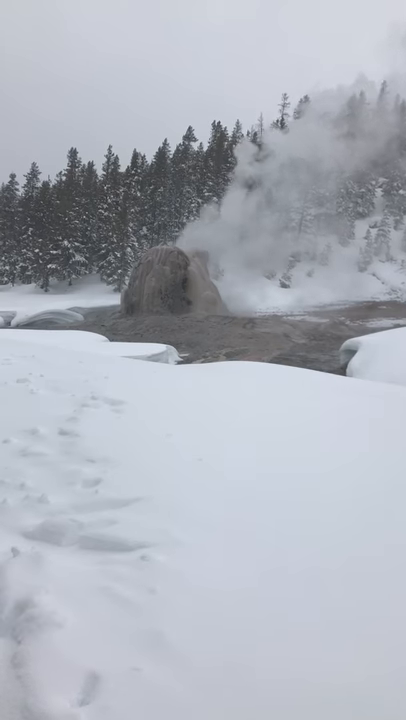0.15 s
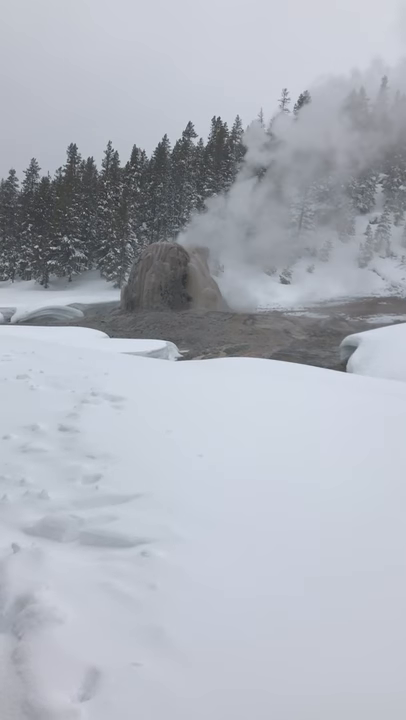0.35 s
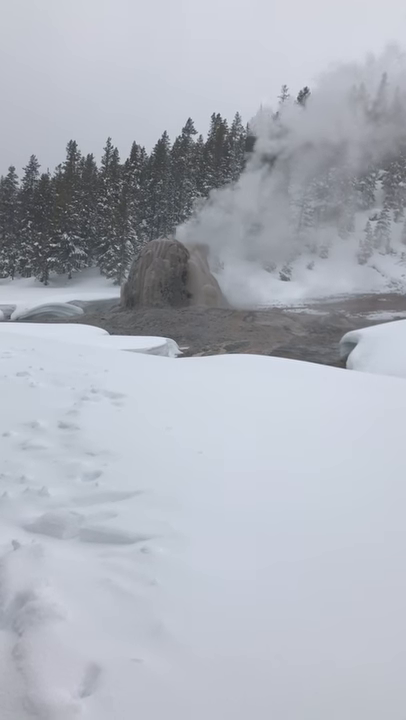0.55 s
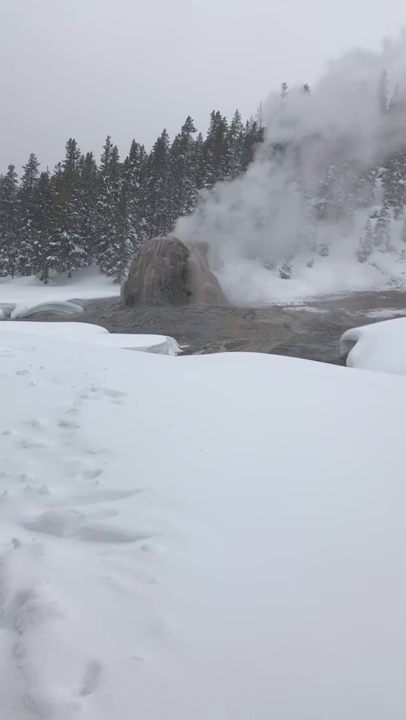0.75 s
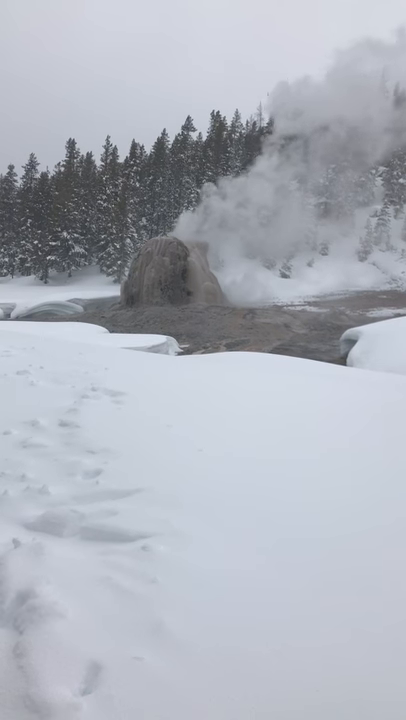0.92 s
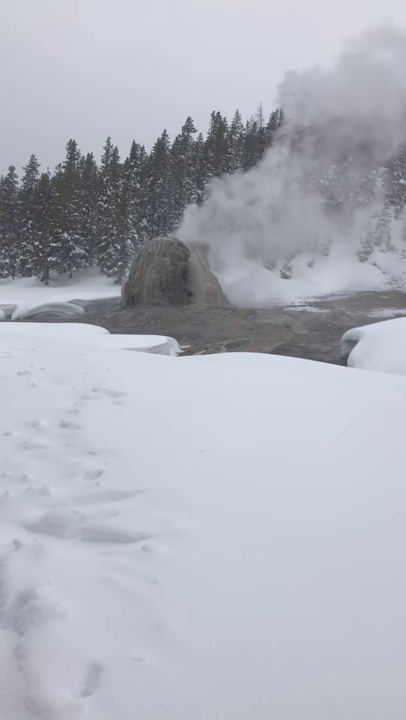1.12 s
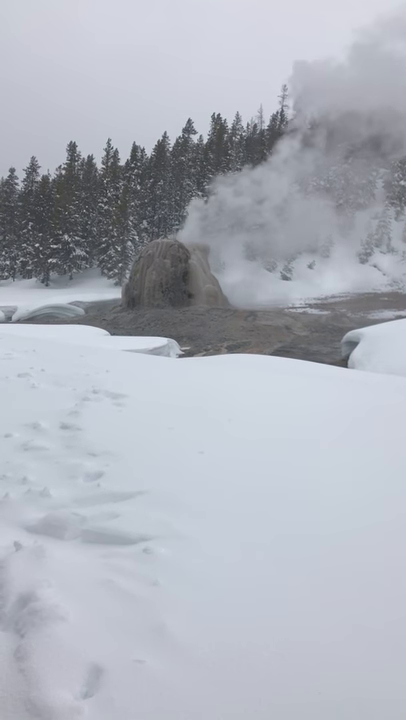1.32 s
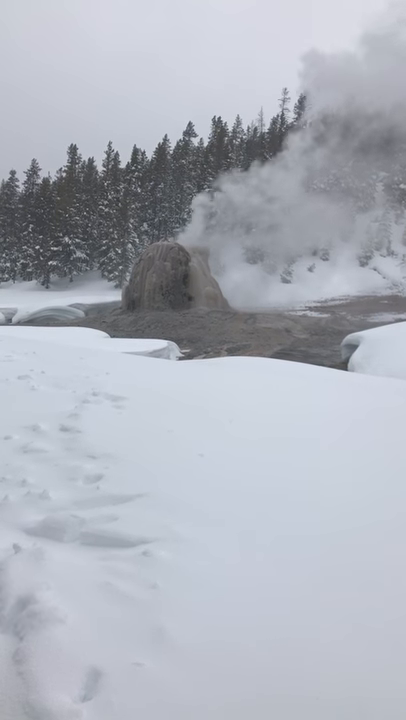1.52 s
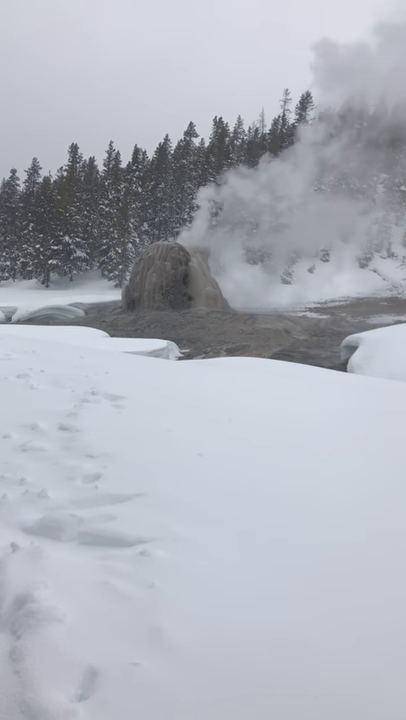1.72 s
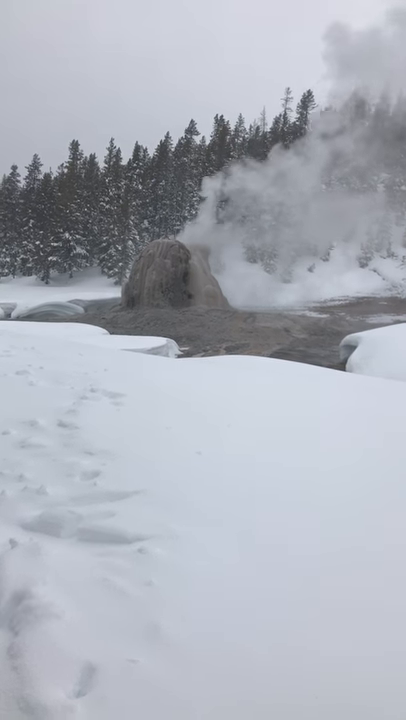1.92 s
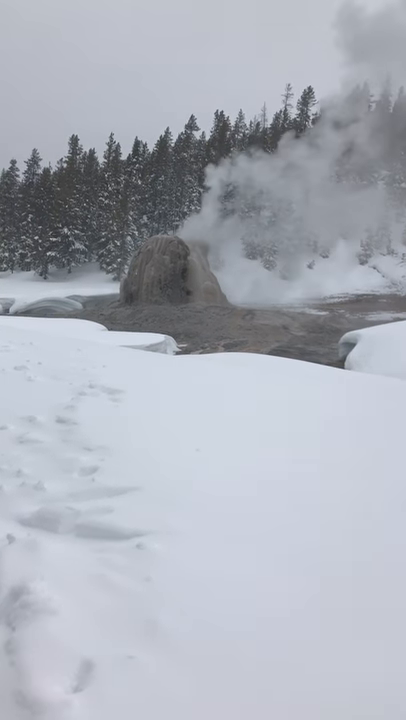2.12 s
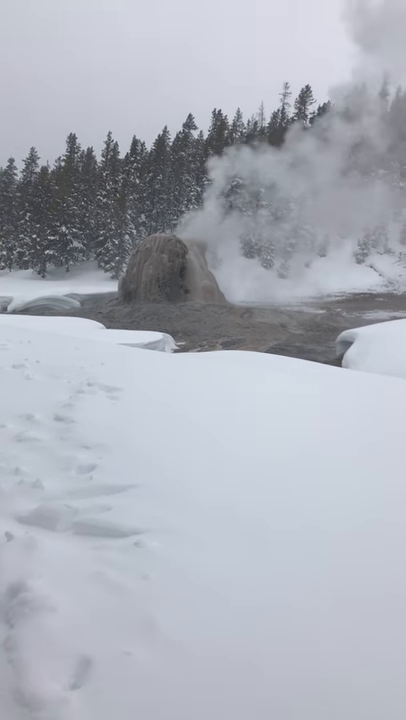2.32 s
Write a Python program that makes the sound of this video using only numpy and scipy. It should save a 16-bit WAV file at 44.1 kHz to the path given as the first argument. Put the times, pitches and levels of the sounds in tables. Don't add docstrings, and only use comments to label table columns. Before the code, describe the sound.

Steady rushing hiss of a steam vent outdoors, fine water spatter, wind bumps and tiny ticks

```python
import sys
import numpy as np
from scipy import signal
from scipy.fft import rfft, irfft
from scipy.io import wavfile
from scipy.ndimage import uniform_filter1d

SR = 44100
rng = np.random.default_rng(int(sys.argv[2]) if len(sys.argv) > 2 else 0)


def elevation(decibels):
    levels = np.asarray(decibels, float)
    return 10 ** (levels / 20)


def transcribe(u):
    v = np.clip(np.atleast_2d(u).T, -1, 1)
    q = np.round(v * 32767).astype(np.int16)
    wavfile.write(sys.argv[1], SR, q)


N = 103635
T = np.arange(N) / SR


def curve(table):
    times, values = np.array(table).T
    return np.interp(T, times, values)


def level(x, db):
    return x * elevation(db) / np.sqrt(np.mean(x ** 2))


def band(x, hz, width):
    b, a = signal.iirpeak(min(hz, .45 * SR), hz / width, fs=SR)
    return signal.lfilter(b, a, x)


def band_noise(hz, width, second_width):
    return band(band(rng.standard_normal(N), hz, width), hz, second_width)


def walk(rate_hz):
    hold = int(SR / rate_hz)
    w = np.repeat(rng.standard_normal(N // hold + 1), hold)
    w = uniform_filter1d(uniform_filter1d(w, hold), hold)[:N]
    w = w - uniform_filter1d(w, size=4 * hold)
    return w / w.std()


def ring(start_s, size, hz, decay_s, rise_s):
    t = np.arange(int(5 * decay_s * SR) + 8) / SR
    i = int(start_s * SR)
    envelope = np.exp(-t / decay_s) * (1 - np.exp(-t / rise_s))
    wave = size * np.sin(2 * np.pi * hz * t) * envelope
    return slice(i, min(i + len(t), N)), wave[:N - i]


def throat():
    # pitch_hz, width_hz, level_db
    modes = [
        (464, 190, -9.5),
        (637, 197, 4.5),
        (957, 185, 0.5),
        (1099, 240, 2),
        (1545, 180, -4),
    ]
    # start_s, level_db
    surge = [(.05, -60), (.32, -61), (.54, -62), (.64, -52), (.7, -60), (.78, -52.5), (.95, -53.5),
             (1.02, -60.5), (1.09, -57), (1.19, -62.5), (1.51, -64), (1.59, -56), (1.78, -55),
             (1.94, -56.5), (2.06, -54.5), (2.19, -53), (2.26, -60), (2.34, -49)]
    shared_gulp_db = .9 * walk(21.9)
    roar = np.zeros(N)
    for hz, width, db in modes:
        gain = elevation(db + shared_gulp_db + 1.3 * walk(15))
        roar += gain * band_noise(hz, width, 1.4 * width) / np.sqrt(width)
    return level(roar, -0.13) * elevation(curve(surge))


def spurts():
    spurts_per_s, decay_s, spurt_db = 70, 0.0013, -1.5
    kicks = np.zeros(N)
    when, size = rng.random((400, 2))[:int(spurts_per_s * N / SR)].T
    kicks[(when * N).astype(int)] = elevation(spurt_db) * np.minimum(-np.log(1 - size), 2)
    return 1 + signal.lfilter([1], [1, -np.exp(-1 / (decay_s * SR))], kicks)


def spray():
    # pitch_hz, level_db
    spectrum = [
        (110, -10),
        (228, -2),
        (500, -3),
        (1300, -5.5),
        (2400, -7.5),
        (4000, -7.5),
        (9000, -13),
        (16000, -22),
    ]
    # start_s, level_db
    flow = [(.04, 2), (.2, 0), (.5, -1.5), (.66, 0), (.8, 0), (.95, 0), (1.3, -0.5), (1.6, .5), (1.8, -0.5),
            (2.1, 1.5), (2.35, 1)]
    hiss_hz, hiss_db = np.array(spectrum).T
    flutter_db = .6 * walk(35.12)
    burst = spurts()
    hiss = np.zeros(N)
    for hz in 150 * 2 ** np.arange(0, 6.9, 1 / 3):
        flicker_db = .9 * walk(18)
        db = np.interp(np.log(hz), np.log(hiss_hz), hiss_db) + flutter_db + flicker_db
        crackle = burst ** min(hz / 6000, 1)
        hiss += elevation(db) * crackle * band_noise(hz, hz / 2.5, hz / 2.5)
    return level(hiss, -53) * elevation(curve(flow))


def drops():
    drops_per_s, quiet_db, spread_db, cycles = 900, -57.5, 4.5, 2.35
    spatter = np.zeros(N)
    for place, chance, pitch in rng.random((2500, 3))[:int(drops_per_s * N / SR)]:
        hz = 1200 * 9 ** pitch
        loudness = min(-np.log(1 - chance), 3.2)
        size = elevation(quiet_db + spread_db * loudness)
        at, wave = ring(place * N / SR, size, hz, cycles / hz / 3, 3e-5)
        spatter[at] += wave
    return spatter


def wind():
    # start_s, level_db
    gusts = [(.04, -65), (.17, -56), (.24, -38), (.34, -45), (.41, -38), (.53, -38.5), (.58, -47),
             (.71, -31.5), (.79, -41), (.83, -48.5), (.94, -55), (.97, -58), (1.41, -70), (1.72, -49),
             (1.75, -59.5), (2.0, -55), (2.05, -67), (2.35, -66.5)]
    # start_s, level_db, pitch_hz, length_cycles
    thumps = [(.236, -29, 119.4, 1.74), (0.254, -29, 55.4, 1.65), (0.406, -34, 68.3, 3),
              (.455, -35, 102, 2.8), (.51, -36.5, 98, 1.66), (0.549, -46, 110, 2.0),
              (0.617, -30, 68.4, 1.8), (.652, -31.5, 125, 2.3), (.72, -32.5, 50, 3.8),
              (0.878, -39, 53, 3.1), (1.019, -53, 44.5, 2.5), (1.19, -47, 50, 2.6), (1.25, -45.5, 56, 3.3),
              (1.351, -54, 45, 2.7), (1.45, -41.5, 50, 2), (1.494, -33.5, 55, 1.6), (1.56, -45, 64, 1.8),
              (1.595, -39.5, 54, 1.8), (1.632, -40, 80, 1.6), (1.652, -37, 101, 2.1),
              (1.67, -32.5, 54.5, 1.9), (1.699, -36, 74, 2.5), (2.13, -51.5, 136, 2.0),
              (2.16, -49.5, 50, 3.6)]
    buffet_hz, width_hz, evenness = 50, 27.3, 0.81
    x = band_noise(buffet_hz, width_hz, 2.67 * width_hz)
    x = x + elevation(-30) * level(band_noise(100, 64, 64), 0) * x.std()
    size = uniform_filter1d(np.abs(signal.hilbert(x)), size=900)
    x = level(x / size ** evenness, 0) * elevation(curve(gusts))
    x = signal.sosfilt(signal.butter(2, 140, fs=SR, output="sos"), x)
    for start_s, db, hz, cycles in thumps:
        t = T - start_s
        body = np.cos(2 * np.pi * hz * t)
        edge = elevation(-14) * np.sin(3.8 * np.pi * hz * t)
        x = x + elevation(db) * (body + edge) * np.exp(-.5 * (3.0 * t * hz / cycles) ** 2)
    return signal.sosfilt(signal.butter(2, 27, "high", fs=SR, output="sos"), x)


def ticks():
    # start_s, peak_db, pitch_hz
    flakes = [(.041, -37, 5360), (.077, -44, 3300), (.127, -34.5, 3680), (.267, -43, 5000),
              (.282, -32, 4440), (0.2817, -33, 6000), (.415, -37, 4000), (.660, -38, 5300),
              (.938, -43, 9000), (1.857, -50, 5200), (1.880, -38, 5400), (1.9, -45, 4360),
              (2.028, -42, 9000), (2.208, -37.5, 5000), (2.265, -44, 4730), (2.276, -42, 9100),
              (2.306, -52, 11000)]
    t60_s, crack_db, trim_db = .0035, -12, -1
    out = np.zeros(N)
    for start_s, db, hz in flakes:
        at, wave = ring(start_s + .0008, elevation(db + trim_db), hz, t60_s / np.log(1000), 1e-4)
        crack = rng.standard_normal(400)[:len(wave)]
        crack = crack * np.exp(-np.arange(len(wave)) / SR / 0.00032)
        out[at] += wave + elevation(db + trim_db + crack_db) * crack
    return out


def scene():
    # pitch_hz, width_hz, depth (0-1)
    dips = [
        (775, 93, 0.55),
        (5000, 140, 0.47),
        (7680, 1200, 0.26),
        (10400, 500, 0.43),
    ]
    far = throat() + spray() + drops()
    for hz, width, depth in dips:
        far = far - depth * band(far, hz, width)
    return (far + ticks() + wind())[None]


def top_cut(x):
    return signal.sosfilt(signal.butter(12, 16120, fs=SR, output="sos"), x)


def record(dry):
    top_hz, start_s = 15830, 0.033
    spectrum = rfft(dry, axis=1) * (np.arange(N // 2 + 1) * SR / N < top_hz)
    mix = irfft(spectrum, N, axis=1) * (T > start_s)
    return top_cut(mix)


dry = scene()
out = record(dry)
transcribe(out)
```